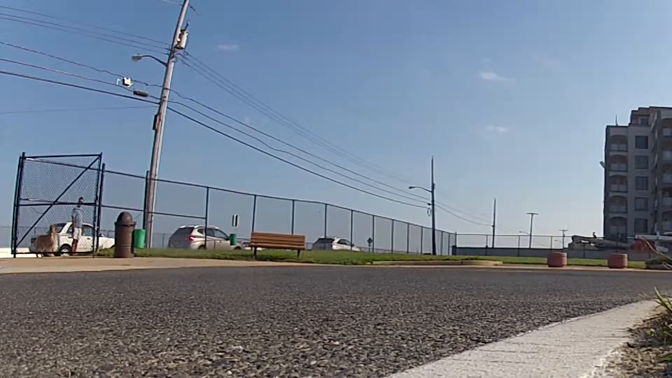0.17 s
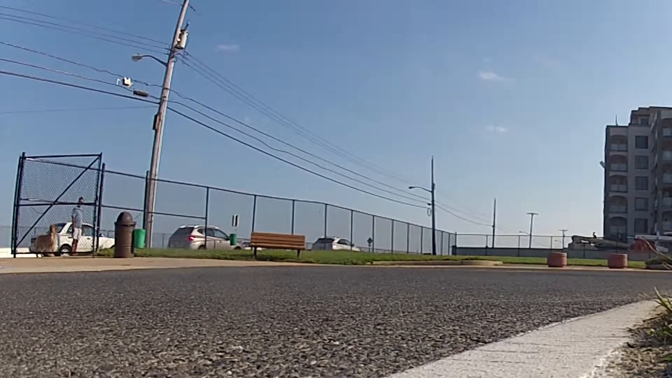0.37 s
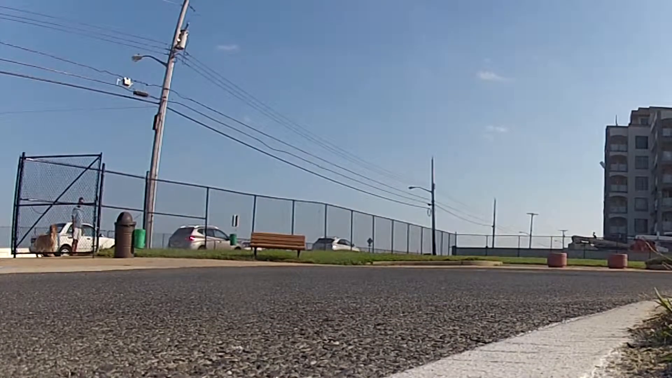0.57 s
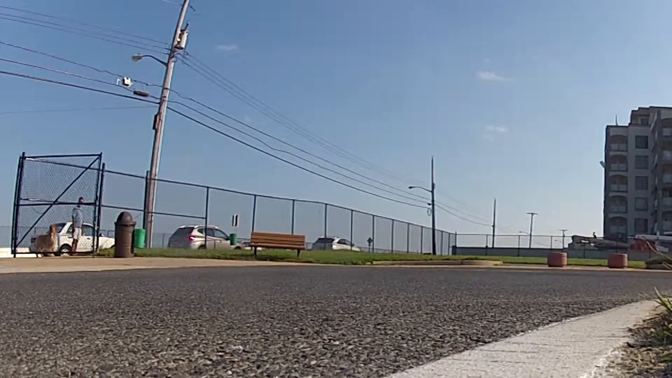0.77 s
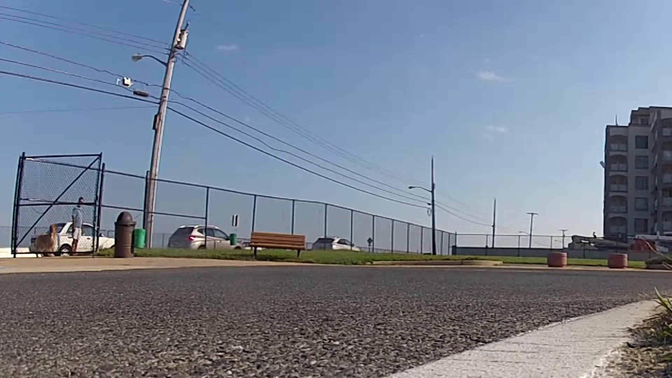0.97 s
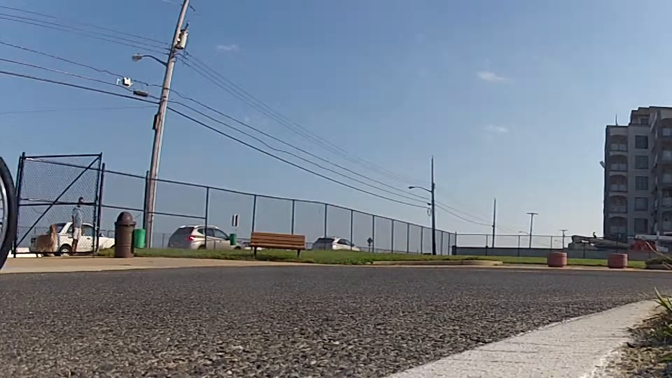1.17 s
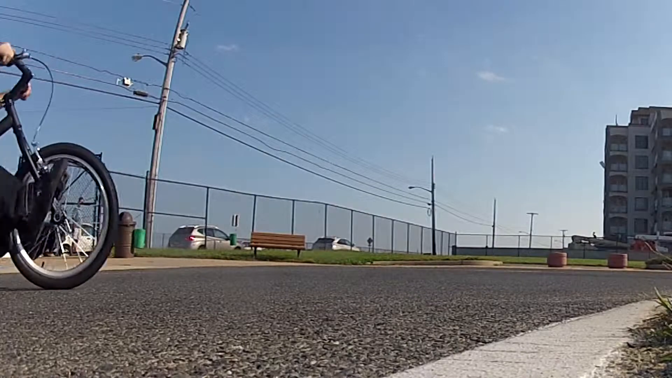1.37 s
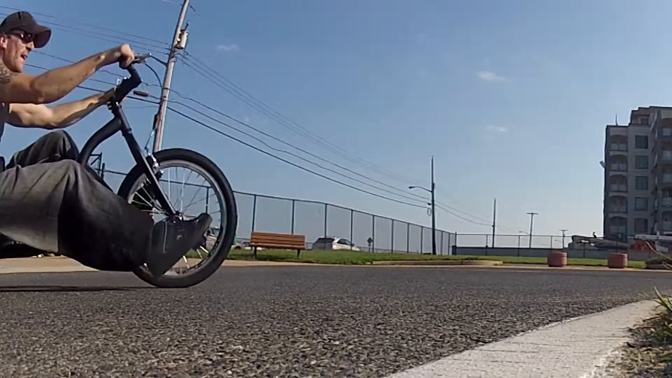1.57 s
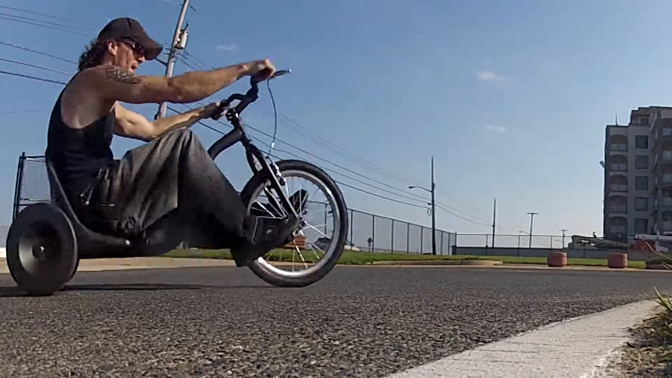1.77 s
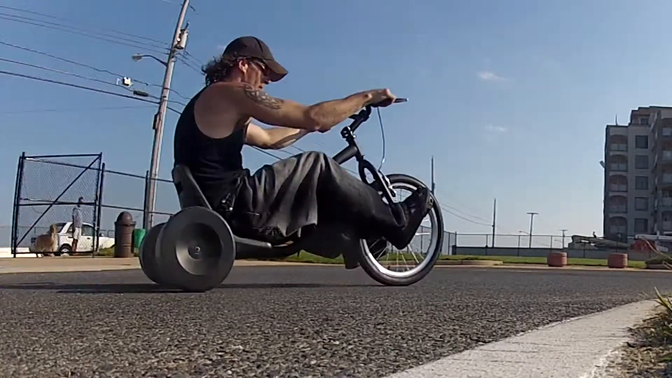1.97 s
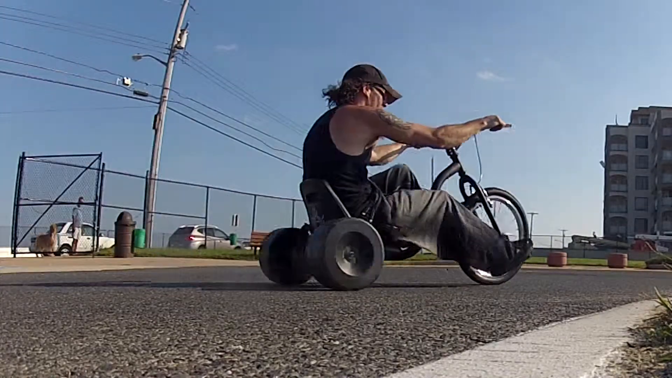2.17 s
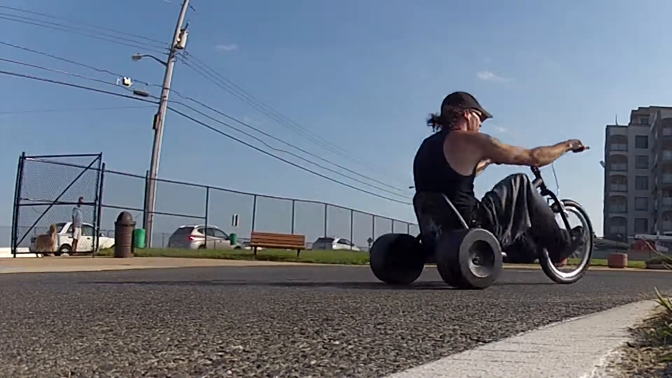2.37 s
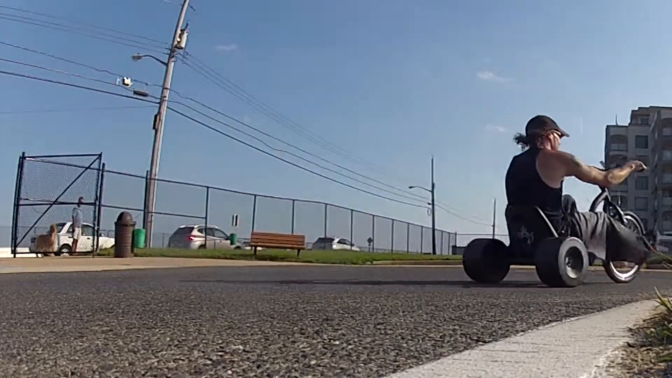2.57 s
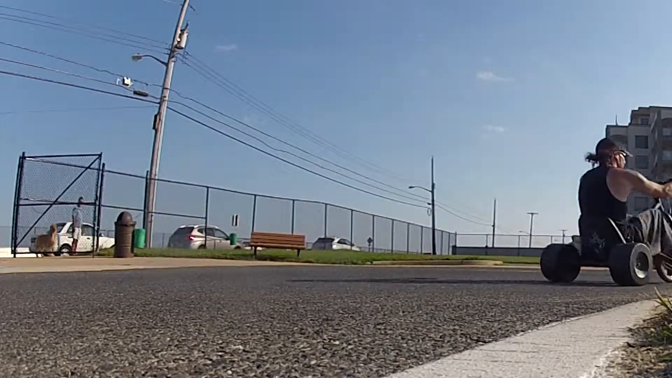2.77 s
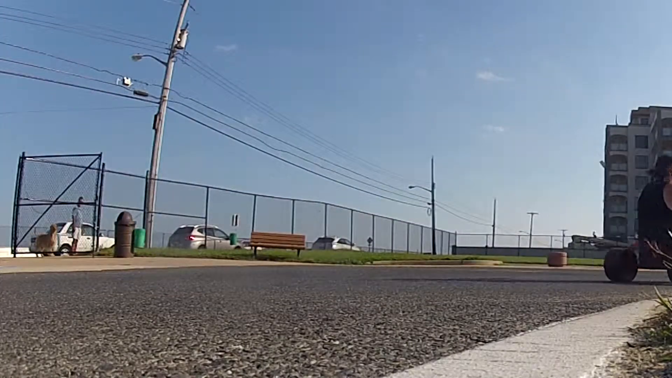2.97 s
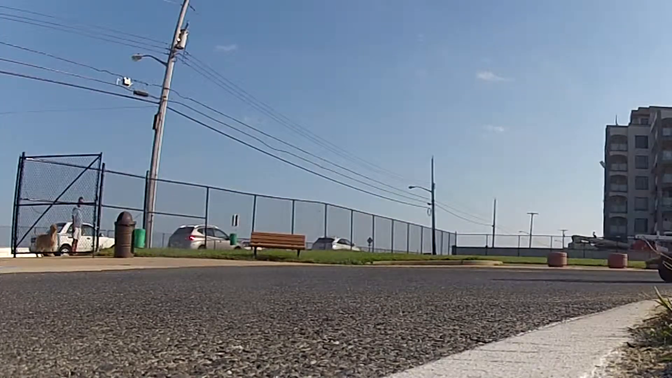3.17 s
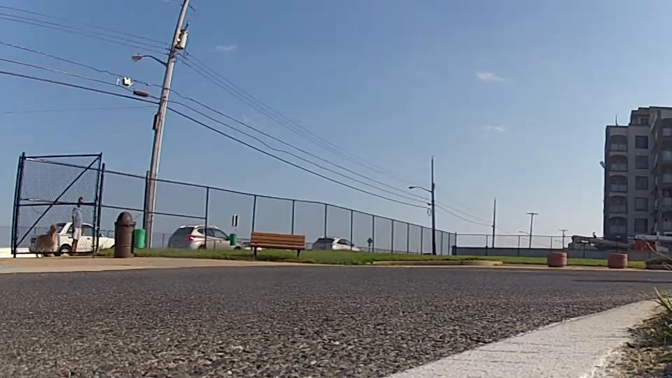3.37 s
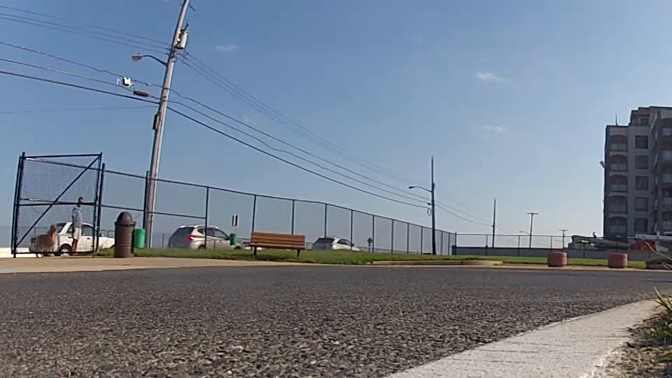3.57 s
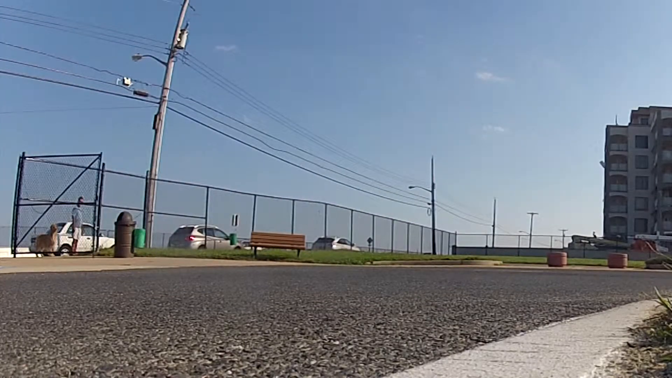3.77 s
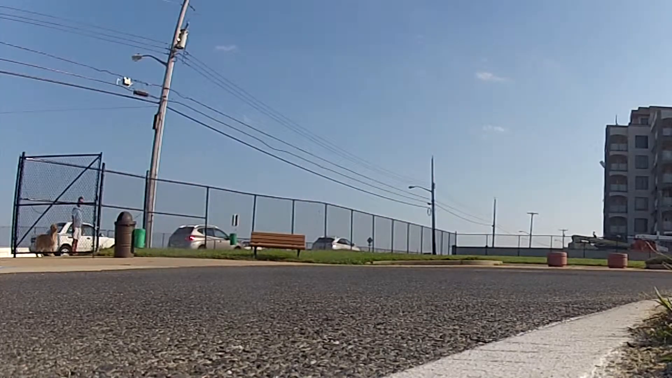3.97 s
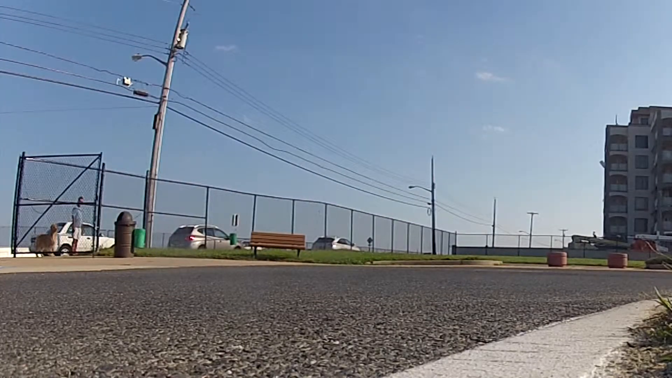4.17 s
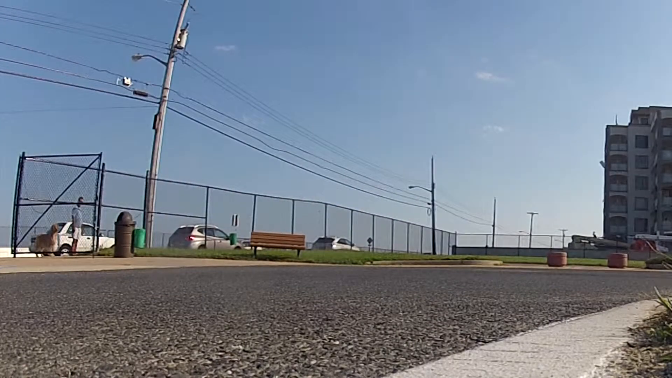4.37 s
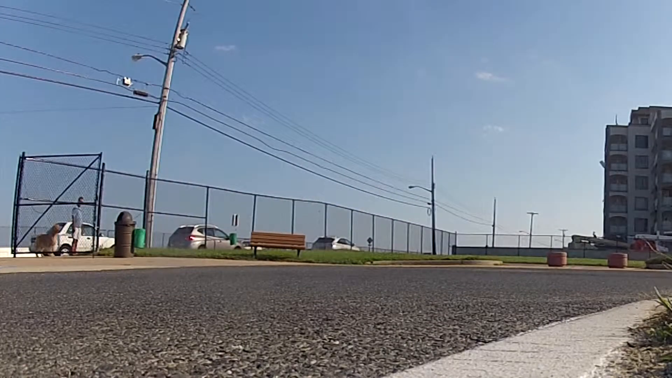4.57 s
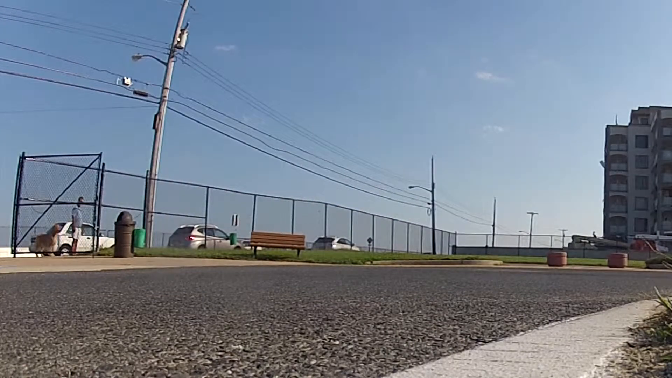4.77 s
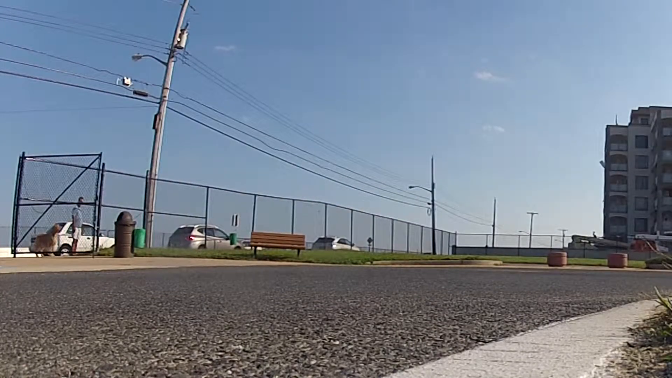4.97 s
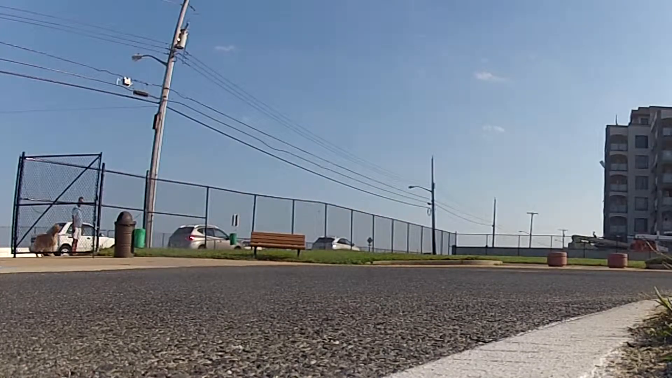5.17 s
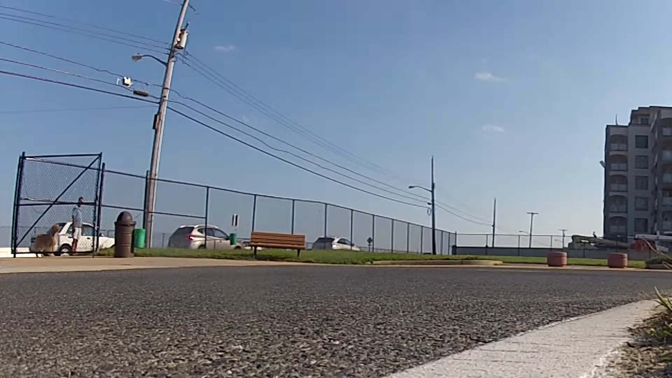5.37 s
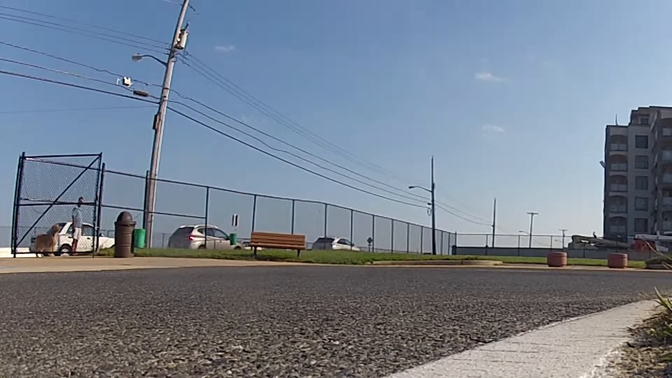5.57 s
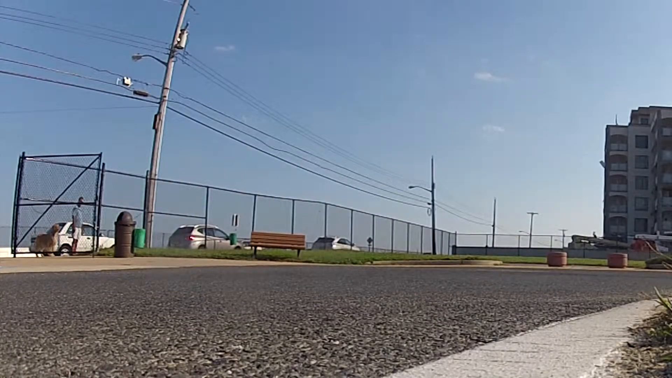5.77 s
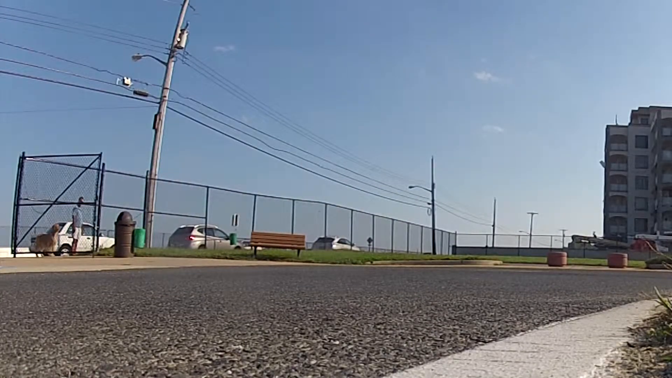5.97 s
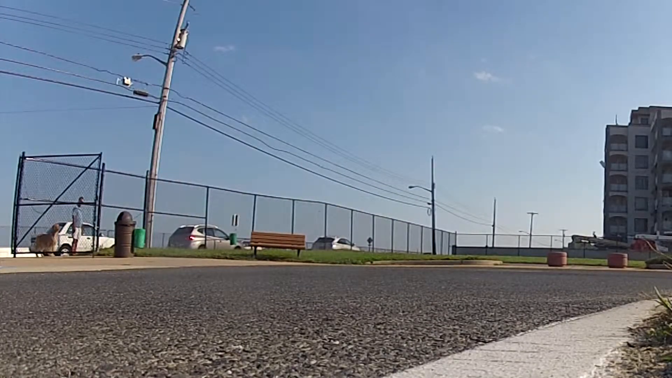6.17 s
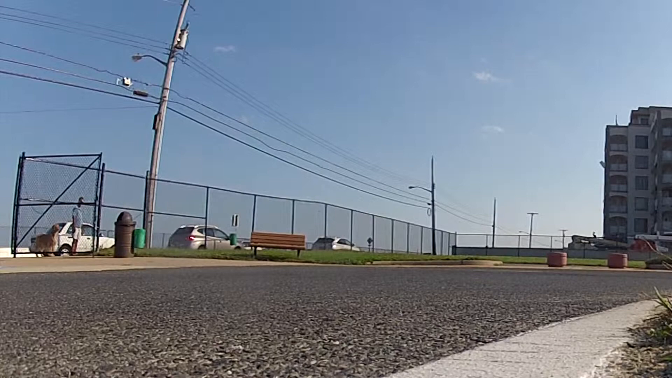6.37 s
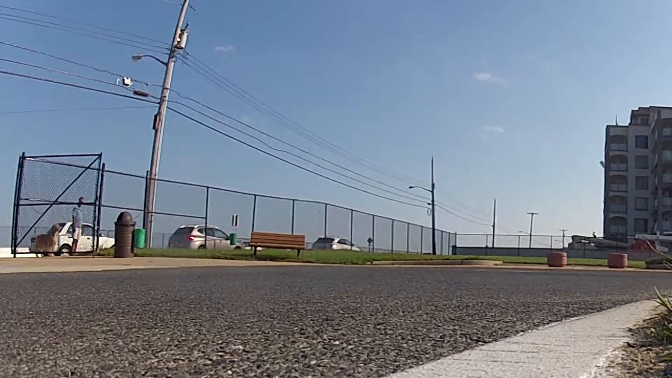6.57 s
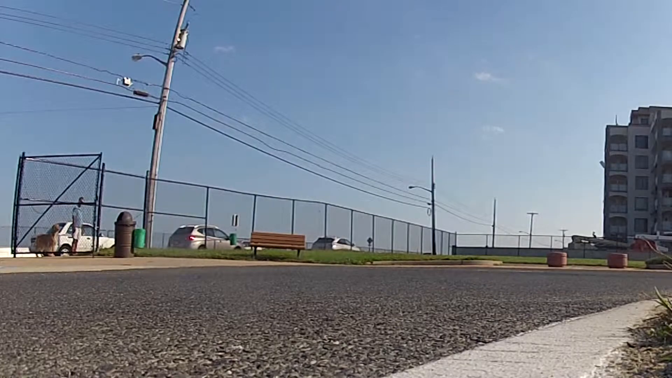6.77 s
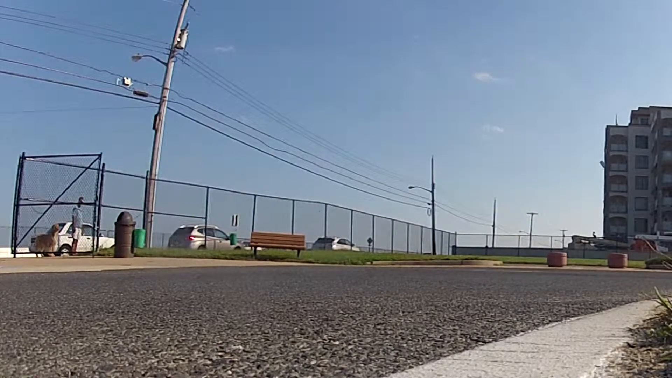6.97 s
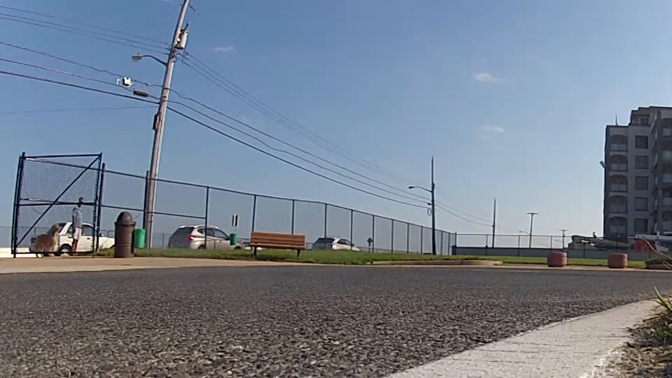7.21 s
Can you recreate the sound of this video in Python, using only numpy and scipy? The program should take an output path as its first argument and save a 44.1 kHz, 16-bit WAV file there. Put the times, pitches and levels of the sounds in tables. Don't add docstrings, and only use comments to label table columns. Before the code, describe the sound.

A plastic-wheeled trike approaches, thuds and scrapes past a muffled ground microphone, fades away, then gives one short, lumpy far-off skid.

```python
import sys
import numpy as np
from scipy import signal
from scipy.fft import rfft, irfft
from scipy.io import wavfile
from scipy.ndimage import uniform_filter1d

SR = 44100
rng = np.random.default_rng(int(sys.argv[2]) if len(sys.argv) > 2 else 0)


def output_pcm(signal):
    pcm = np.clip(np.atleast_2d(signal).T, -1, 1) * 32767
    wavfile.write(sys.argv[1], SR, np.round(pcm).astype(np.int16))


def attenuation_scalar(level_db):
    decades = np.asarray(level_db, float) / 20
    return 10 ** decades


N = 319284
NEAREST_S, TURN_S = 1.87, 2.27


def evened(x):
    return x / np.sqrt(np.mean(x ** 2) + 1e-20)


def columns(rows):
    s, *values = np.transpose(rows)
    return [np.interp(np.arange(N) / SR, s, v) for v in values]


def colour(x, points):
    f, level_db = np.transpose(points)
    hz = np.fft.rfftfreq(N, 1 / SR)
    gain_db = np.interp(np.log(hz + 1), np.log(f), level_db, -90, -90)
    return evened(irfft(rfft(x) * attenuation_scalar(gain_db), N))


def resonate(x, hz, width):
    turn = np.exp(2j * np.pi * np.cumsum(hz * np.ones(len(x))) / SR)
    r = np.exp(-np.pi * width / SR)
    return 2 * (turn * signal.lfilter([1 - r], [1, -r], x / turn)).real


def steep_ring(x, hz, width, second_width):
    return evened(resonate(resonate(x, hz, width), hz, second_width))


def drift(hz):
    low_pass = signal.butter(2, hz, fs=SR, output="sos")
    return evened(signal.sosfilt(low_pass, rng.standard_normal(N)))


def grain(per_s, spread_db, wash):
    struck = rng.random(N) < per_s / SR
    sign = rng.choice([-1., 1.], N)
    size = np.minimum(rng.exponential(1, N), 4)
    return evened(struck * sign * attenuation_scalar(spread_db * size)) + wash * rng.standard_normal(N)


# f/Hz, level/dB per Hz
SHELL = [(160, -53.5), (270, -4), (328, 4), (367, -0.5), (466, 4), (537, -5), (595, -5), (714, -20),
         (780, -18), (1010, -39), (1720, -120)]
# f/Hz, width/Hz, level/dB
SHELL_MODES = [(381.8, 50, -1), (552.8, 41.5, 4), (640, 89, 3)]
# f/Hz, width/Hz, level/dB
DRUM = [(239.9, 11.5, -1.5), (260, 74, -0.5), (222.3, 23, -6)]
# f/Hz, level/dB per Hz
FRAME = [(53, -31), (90, 2.5), (156, 1), (204, -1.5), (215, -14), (280, 1), (470, -120)]
# f/Hz, level/dB per Hz
RIM = [(410, -25.5), (700, -2.5), (896, -10), (978, -6.5), (1040, -14.5), (1570, -20.5), (1830, -28),
       (2600, -34.5), (3380, -59), (5720, -120)]
# t/s, rattle level/dB, sideways skid level/dB
ROLL = [(0.0, -40, -2), (0.33, -36, -4), (0.54, -36.5, 4), (0.76, -32, -0.5), (1.17, -31, -8),
        (1.5, -26, -1), (1.77, -22.5, -6), (2.0, -23.5, 0), (2.13, -19.5, -9), (2.42, -21.5, -2.5),
        (2.9, -23.5, -0.5), (3.27, -26, 3), (3.75, -29, 6), (4.21, -28.5, 5.5), (4.68, -33.5, 4.5),
        (5.2, -34.5, 3.5), (6.3, -38, -0.5), (7.24, -39.5, -3.5)]


def wheels():
    roll_db, skid_db = columns(ROLL)
    t = np.arange(N) / SR
    far, shake = far_slide(), jolts()
    near = np.exp(-((t - NEAREST_S) / 0.46) ** 2)
    road = grain(per_s=700, spread_db=2.5, wash=1.0) * attenuation_scalar(0.75 * drift(25))

    modes = sum(attenuation_scalar(db) * resonate(road, hz * (1 + 0.038 * drift(3.0)), w) for hz, w, db in SHELL_MODES)
    shell = colour(road + 0.5 * evened(modes), SHELL)
    shell_gain = attenuation_scalar(roll_db) + attenuation_scalar(-2.5) * far + shake
    far_ring = attenuation_scalar(-9) * far * steep_ring(road, 544, 57, 3 * 57)

    drum = evened(sum(attenuation_scalar(db) * steep_ring(road, hz, w, 3 * w) for hz, w, db in DRUM))
    drum_gain = attenuation_scalar(-7.5 + 5.5 * near) * (attenuation_scalar(roll_db) + attenuation_scalar(-15) * far)

    frame_db = -18.5 - 3.5 * near ** 4 - 3.5 * np.tanh((t - TURN_S) / 0.26)
    frame_gain = attenuation_scalar(frame_db) * (attenuation_scalar(roll_db) + far) ** 0.56

    rim = colour(road * attenuation_scalar(2.0 * drift(21)), RIM)
    rim_gain = attenuation_scalar(-19.5) * (attenuation_scalar(roll_db + skid_db + 0.63 * scuffs()) + attenuation_scalar(-2) * far + shake)
    body = shell_gain * shell + far_ring + drum_gain * drum
    return body + frame_gain * colour(road, FRAME) + rim_gain * rim


# t/s, rattle level/dB
FAR_SLIDE = [
    (5.235, -27),
    (5.361, -31.5),
    (5.409, -40.5),
    (5.53, -25),
    (5.68, -29.5),
    (5.88, -24.5),
    (6.01, -36.5),
    (6.2, -32),
    (6.28, -51),
]


def far_slide():
    s, level_db = np.transpose(FAR_SLIDE)
    return uniform_filter1d(attenuation_scalar(np.interp(np.arange(N) / SR, s, level_db, -90, -90)), size=600)


# t/s, length/s, boost level/dB
SCUFFS = [
    (1.44, 0.012, 18),
    (1.497, 0.0081, 8),
    (2.273, 0.075, 3),
    (3.818, 0.035, 6),
    (3.898, .04, 1.5),
    (4.076, .06, 2.5),
    (6.07, 0.035, 4),
    (6.93, 0.046, 5),
]


def scuffs():
    t = np.arange(N) / SR
    return sum(db * np.exp(-((t - s) / length) ** 2) for s, length, db in SCUFFS)


# t/s, peak level/dB, f/Hz, t60/s
BUMPS = [(0.363, -6, 315, 0.03), (0.662, -8.5, 262, 0.28), (0.935, -17, 278, 0.027),
         (1.142, -12, 303, 0.063), (1.432, 2, 392, 0.039), (1.438, 0, 590, 0.015), (1.491, -9, 478, 0.053),
         (1.792, -6.5, 575, 0.12), (2.075, -1.5, 554, 0.13), (2.12, 1.5, 352, 0.096),
         (3.118, -34, 567, 0.15), (3.309, 0, 577, 0.063), (3.597, -10.5, 553, 0.033), (3.83, -6, 576, 0.08),
         (4.239, -4.5, 290, 0.039), (5.241, -9, 420, 0.13), (5.363, -11, 596, 0.035),
         (5.504, -12, 563, 0.092), (5.546, -2, 540, 0.04), (5.581, -5, 537, 0.046),
         (5.616, -3.5, 507, 0.031), (5.648, 5.5, 410, 0.039), (5.774, -9.5, 520, 0.08),
         (5.837, 0, 542.5, 0.12), (5.869, -17, 462, 0.044), (5.974, -6, 573, 0.02), (6.037, -1, 466, 0.1),
         (6.104, 1, 505, 0.11), (6.183, -7, 538, 0.12), (6.214, -16, 550, 0.037)]


def bumps():
    out, t = np.zeros(N), np.arange(6000) / SR
    for (s, peak_db, hz, t60), u in zip(BUMPS, rng.random((len(BUMPS), 6000))):
        tones = np.sin(2 * np.pi * hz * t)
        tones += 0.3 * np.sin(2 * np.pi * (hz * (1.25 + 0.247 * u[0]) * t + u[1]))
        tones += 0.22 * np.sin(2 * np.pi * hz * 0.416 * t)
        thud = tones * attenuation_scalar(-60 * t / max(t60, 0.02)) * (1 - np.exp(-t / 0.0017)) ** 2
        snap = (u - 0.5) * attenuation_scalar(-60 * t / 0.065) * (1 - np.exp(-t / 0.003))
        knock = steep_ring(snap, 830, 350, 500)
        knock_db = -16 if s > 6 else -23.5
        hit = thud / abs(thud).max() + attenuation_scalar(knock_db) * knock / abs(knock).max()
        add(out, s - 0.0025, attenuation_scalar(peak_db - 13.0) * hit)
    return out


def jolts():
    out, t = np.zeros(N), np.arange(9000) / SR
    for s, peak_db, hz, t60 in BUMPS:
        add(out, s, attenuation_scalar(peak_db - 25 - 60 * t / 0.12))
    return uniform_filter1d(out, size=200)


def add(mix, s, sound):
    part = mix[round(s * SR):][:len(sound)]
    part += sound[:len(part)]


# f/Hz, level/dB per Hz
COARSE_TONE = [(790, -7), (1350, -4.5), (2210, -9), (2660, -6.5), (3050, -6.5), (3350, -24), (4360, -43),
               (7370, -120)]
# f/Hz, level/dB per Hz
FINE_TONE = [(1940, -31.5), (3300, -8), (3450, -7.5), (3860, -2.5), (4520, -4.5), (5170, -4), (5310, -7),
             (5990, -10.5), (7790, -53), (13200, -120)]
# t/s, level/dB
SAND = [(0.0, -52.5), (0.7, -47), (1.01, -46), (1.95, -47.5), (2.24, -41.5), (2.8, -39.5), (3.17, -43),
        (3.29, -41), (3.53, -46), (3.88, -53.5), (4.45, -56.5), (5.38, -56), (5.81, -52.5), (6.71, -54.5),
        (7.14, -53), (7.24, -49)]
# t/s, share level/dB, f/Hz
SQUEAL = [
    (0.0, -5, 2230),
    (1.01, -5.5, 2020),
    (1.33, -5, 2050),
    (1.73, 4, 1906),
    (1.95, 5.5, 1830),
    (2.3, -1.5, 2120),
    (2.6, -14, 2150),
    (3.4, -14, 2043),
    (4.3, -7.5, 2050),
]


def scrape():
    (coarse_db,), (squeal_db, squeal_hz) = columns(SAND), columns(SQUEAL)
    fine_db = coarse_db - 10 - 0.75 * np.maximum(squeal_db - 3.5, 0)

    crushed = grain(per_s=200, spread_db=1.5, wash=0) * attenuation_scalar(2.4 * drift(11.0))
    burst = rng.standard_normal(400) * attenuation_scalar(-60 * np.arange(400) / SR / 0.032)
    crackle = evened(signal.oaconvolve(crushed, burst)[:N])
    catch_db = scuffs()
    hiss = rng.standard_normal(N) * attenuation_scalar(1.03 * drift(34) + 0.5 * catch_db)
    sand = hiss + attenuation_scalar(-6.5 + catch_db) * crackle

    squeal_hz = squeal_hz * (1 + 0.029 * drift(13.5))
    squeal = steep_ring(sand, squeal_hz, 600, 600)
    core = evened(resonate(sand, squeal_hz * (1 + 0.04 * drift(4)), 91))
    squeal = squeal + attenuation_scalar(-9.5) * core

    spit_db = np.where(np.arange(N) / SR < NEAREST_S, -1, -6)
    coarse = evened(colour(sand, COARSE_TONE) + attenuation_scalar(squeal_db) * squeal)
    return attenuation_scalar(coarse_db) * coarse + attenuation_scalar(fine_db) * colour(sand + attenuation_scalar(spit_db) * crackle, FINE_TONE)


# f/Hz, width/Hz, level/dB
CASE = [(2030, 280, 4), (2530, 470, -1.5), (2950, 220, 2), (3430, 1600, -0.5), (3950, 340, -4),
        (4650, 700, -5.5), (1400, 1700, -9.5), (5840, 690, -7.5)]
# t/s, peak level/dB, low ring f/Hz, high ring f/Hz, upper part level/dB
GRIT = [(0.298, -24, 2060, 4050, -9), (0.3035, -27, 2000, 4100, -6), (0.3712, -27.5, 2310, 4650, -5),
        (0.4458, -21.5, 2600, 4300, -1.5), (0.6073, -11, 2070, 4650, -4.5), (0.6585, -10, 2850, 4100, -7.5),
        (0.6921, -25, 2870, 3400, -15), (0.8698, -17, 2000, 4110, 15), (0.8792, -19.5, 2190, 4650, 11),
        (0.925, -24.5, 2180, 3850, -9), (1.153, -25.5, 2900, 3700, 1), (1.251, -13, 3130, 4260, 5),
        (1.3046, -5, 1980, 3950, -1), (1.4045, -16.5, 2950, 4030, 3), (2.2526, -24.5, 2050, 4550, 2),
        (2.4169, -26, 2763, 4470, -3), (2.6423, -28, 2900, 3870, -4), (2.675, -27.5, 1910, 4730, 15),
        (2.9283, -5, 2580, 3810, 8), (2.9784, -29.5, 2930, 3780, -1), (3.169, -22, 2050, 3796, 4.5),
        (3.2984, -23.5, 2310, 3630, -8), (3.4045, -10.5, 2670, 3840, 3.5), (3.814, -31.5, 1550, 3530, -30)]
# t/s, peak level/dB, upper part level/dB
TICKS = [(0.0488, -36, -16), (0.0722, -38, -12), (0.1291, -37.5, 1), (0.239, -45, 2), (0.255, -35.5, -20),
         (0.3336, -36, -13), (0.855, -34, -13), (1.036, -29, 3), (1.101, -33, -2), (1.483, -42, -10),
         (1.5199, -40, -22), (1.6623, -36, -9), (1.725, -40, -25), (1.8074, -31.5, -7), (1.9655, -31, -25),
         (2.7456, -30.5, 3), (3.4554, -32.5, -5), (3.7758, -45, -15), (3.8526, -40, -17), (3.872, -41, -19),
         (3.903, -42, 0), (3.93, -41.5, -5), (4.045, -49, -27), (4.1776, -45, -3), (4.2388, -46, 1),
         (4.6136, -45, 7), (4.696, -42, -11), (6.045, -43, 6), (6.9144, -47, -12), (6.9496, -46, -18)]


def grit():
    out, t = np.zeros(N), np.arange(2600) / SR
    bends = 1 + 0.1 * rng.uniform(-1.34, 1, (len(TICKS), 2))
    ticks = [(s, db, 2050 * a, 4110 * b, up_db) for (s, db, up_db), (a, b) in zip(TICKS, bends)]
    snaps = list(GRIT) + ticks
    noises = rng.standard_normal((len(snaps), 2600))
    for (s, peak_db, low_hz, high_hz, high_db), noise in zip(snaps, noises):
        longer, ring_db = (1.6, 6.5) if s > TURN_S else (1, 8)
        fall_db = -60 * t / (0.043 * longer)
        crush = 1 + attenuation_scalar(1) * np.exp(-(t / (0.0052 * longer)) ** 4)
        crack = noise * np.minimum(t / 0.0012, 1) * crush * attenuation_scalar(fall_db)
        quick = crack * attenuation_scalar(1.4 * fall_db)
        low = sum(attenuation_scalar(db) * resonate(crack, f, w) for f, w, db in CASE if f < 3400)
        high = sum(attenuation_scalar(db) * resonate(quick, f, w) for f, w, db in CASE if f > 3400)
        low = resonate(low, 2560, 3100)
        low = evened(low + attenuation_scalar(ring_db) * resonate(resonate(crack, low_hz, 400), low_hz, 400))
        high = evened(high + attenuation_scalar(ring_db) * resonate(resonate(quick, high_hz, 450), high_hz, 450))
        body = attenuation_scalar(-17.5) * steep_ring(crack, 830, 700, 700)
        ring = low + attenuation_scalar(high_db) * high + body
        add(out, s - 0.0012, attenuation_scalar(peak_db + 3.0) * ring / abs(ring).max())
    return out


# t/s, firing f/Hz, level/dB
ENGINE = [
    (0.0, 81.8, -40.5),
    (1.2, 79, -37.5),
    (2.1, 80, -37.5),
    (2.7, 78.86, -39),
    (4.45, 78.3, -39),
    (4.7, 79.77, -39),
    (7.24, 79.57, -39.5),
]
# multiple of the firing rate, level/dB
ENGINE_ORDERS = [(0.499, -14), (0.999, 2), (1.37, -5.5)]
# f/Hz, level/dB per Hz
AIR = [(11, -50.5), (18, -12), (32, -1.5), (65, 2), (100, -19), (130, -34), (220, -120)]


def distance():
    hz, level_db = columns(ENGINE)
    turns = np.cumsum(hz * (1 + 0.014 * drift(5.3))) / SR
    hum = sum(attenuation_scalar(db + 1.36 * drift(8.3)) * np.sin(2 * np.pi * k * turns) for k, db in ENGINE_ORDERS)
    return np.sqrt(2) * attenuation_scalar(level_db) * hum + attenuation_scalar(-47) * colour(rng.standard_normal(N), AIR)


def scene():
    return (wheels() + scrape() + grit() + bumps() + distance())[None]


def top_cut(x):
    return signal.sosfilt(signal.butter(12, 16510, fs=SR, output="sos"), x)


# t/s, level/dB
TOP = [
    (0.1, -10.5),
    (1.5, -3),
    (2.66, -7),
    (2.76, -22),
    (3.1, -21),
    (4.5, -9.5),
]


def record(dry):
    hold_hz, steps = 12000, 4
    top = signal.oaconvolve(dry, signal.firwin(101, 5110, pass_zero=False, fs=SR)[None], "same")
    thinned = dry + (attenuation_scalar(columns(TOP)[0]) - 1) * top
    loose = signal.firwin(3001, 6730, fs=SR * hold_hz // np.gcd(SR, hold_hz))
    slow = signal.resample_poly(thinned, hold_hz, SR, axis=1, window=loose)
    held = signal.resample_poly(np.repeat(slow, steps, axis=1), SR, hold_hz * steps, axis=1)
    edge = signal.firwin(255, 15350, window=("kaiser", 5), fs=SR)
    return top_cut(signal.oaconvolve(held[:, :N], edge[None], "same"))


dry = scene()
out = record(dry)
output_pcm(out)
```